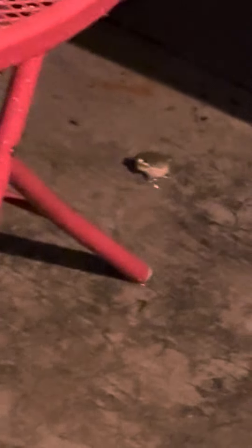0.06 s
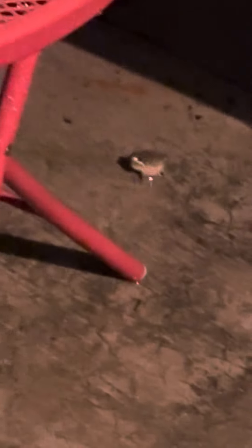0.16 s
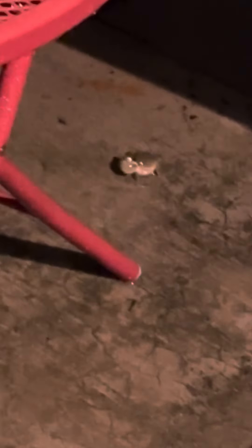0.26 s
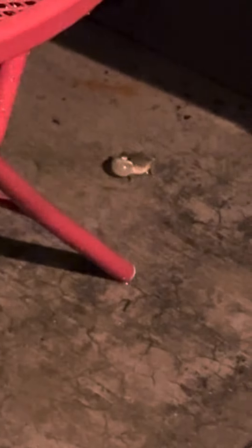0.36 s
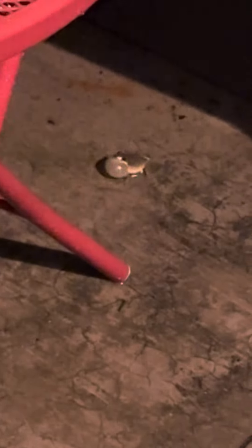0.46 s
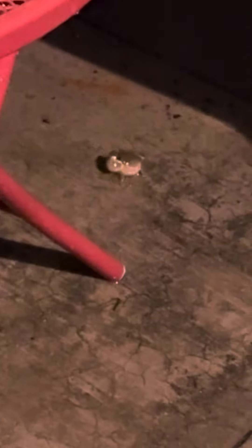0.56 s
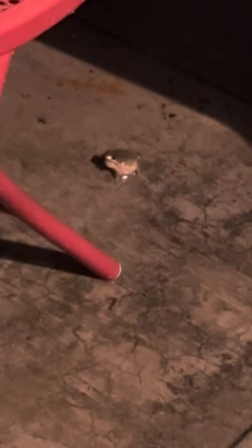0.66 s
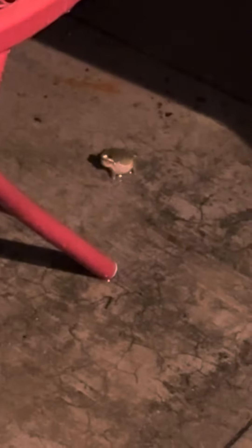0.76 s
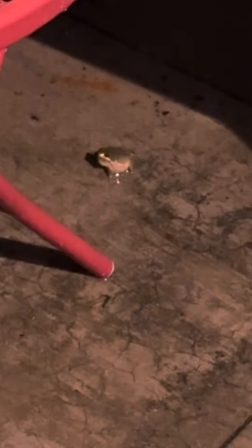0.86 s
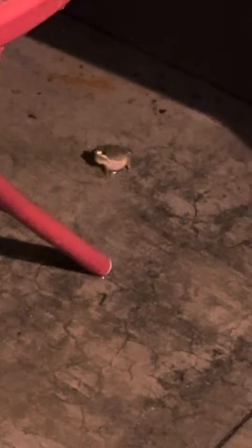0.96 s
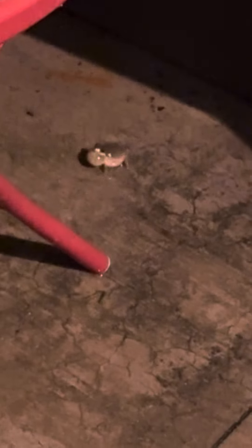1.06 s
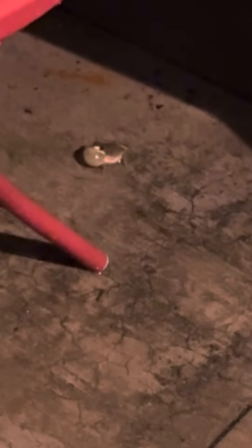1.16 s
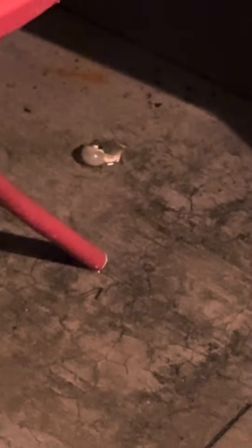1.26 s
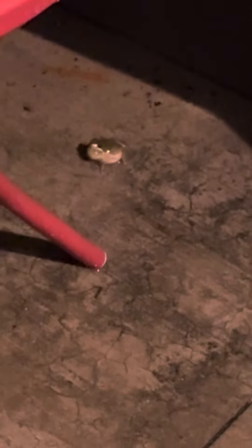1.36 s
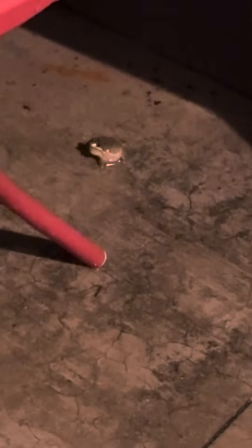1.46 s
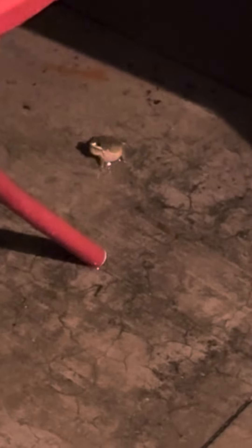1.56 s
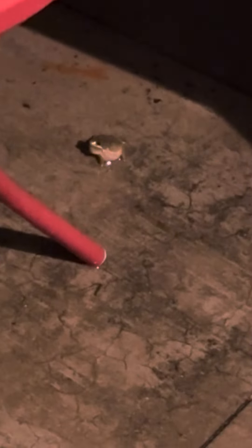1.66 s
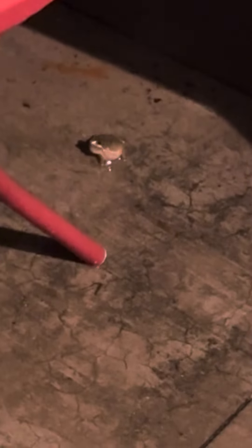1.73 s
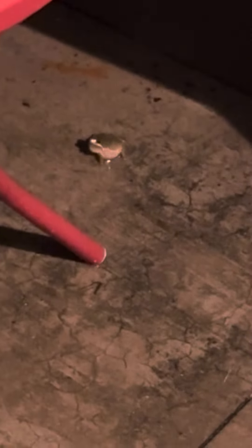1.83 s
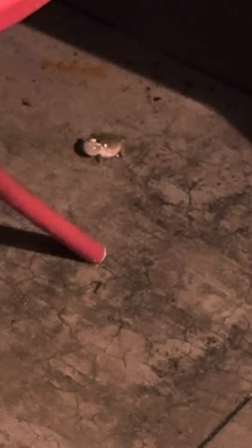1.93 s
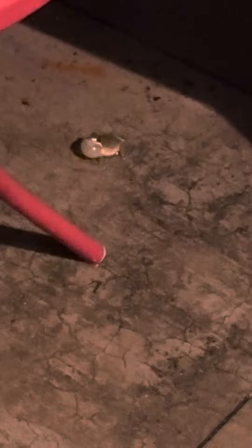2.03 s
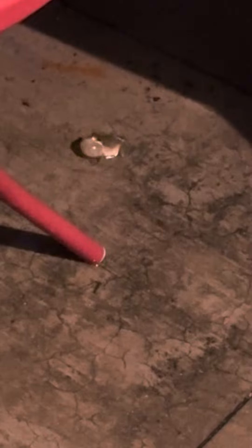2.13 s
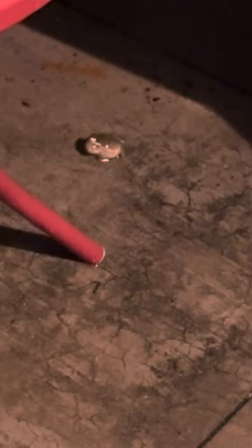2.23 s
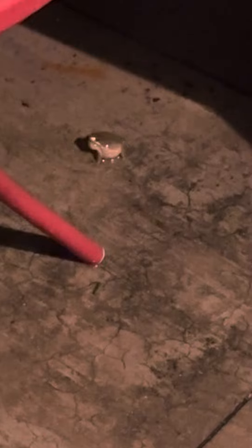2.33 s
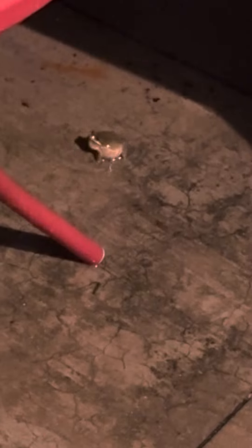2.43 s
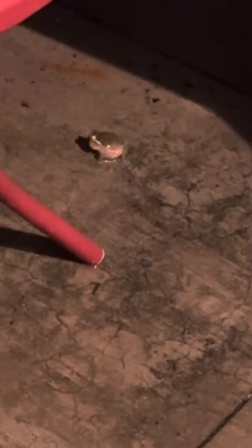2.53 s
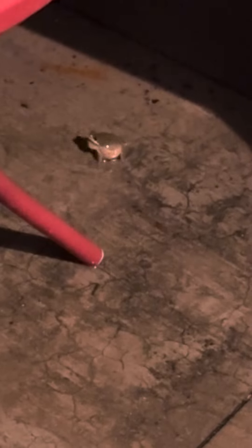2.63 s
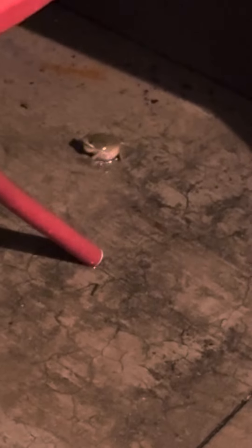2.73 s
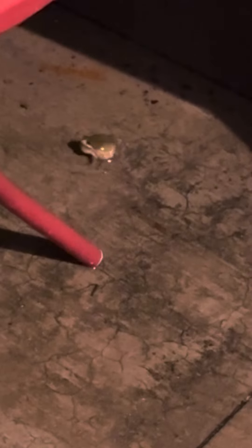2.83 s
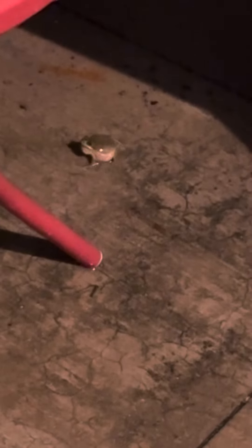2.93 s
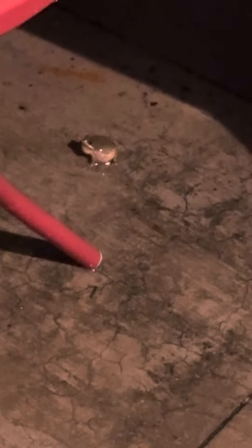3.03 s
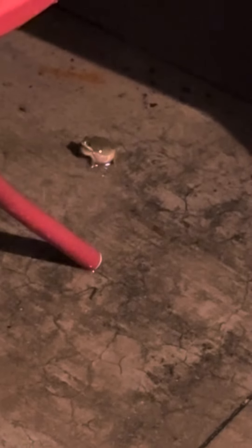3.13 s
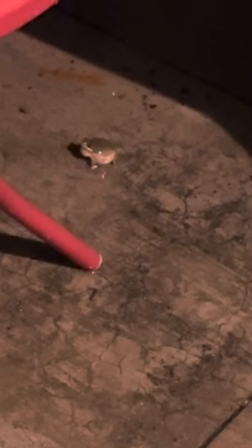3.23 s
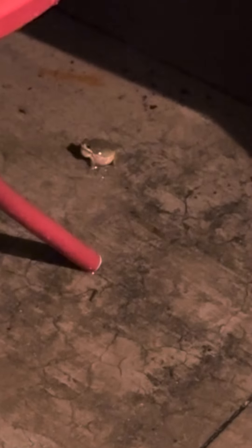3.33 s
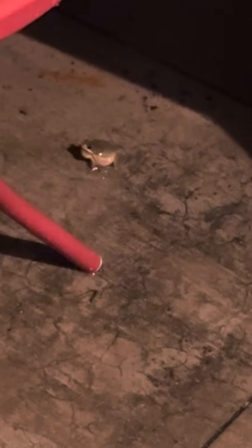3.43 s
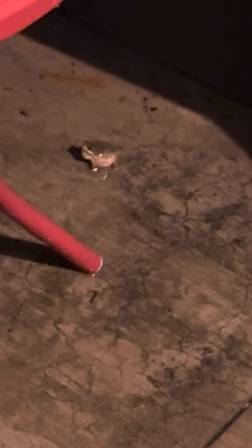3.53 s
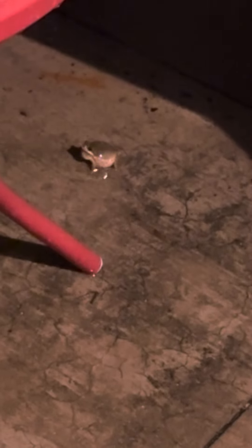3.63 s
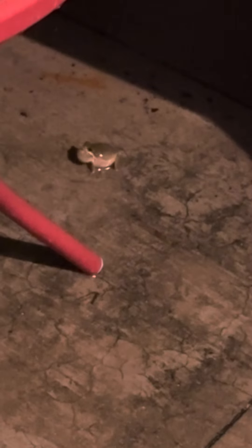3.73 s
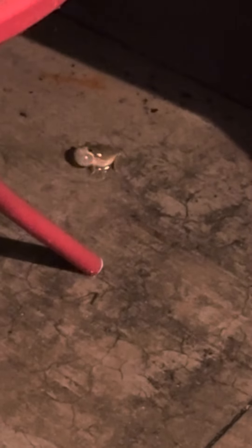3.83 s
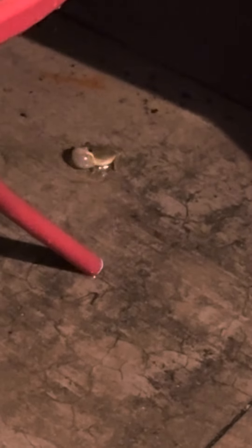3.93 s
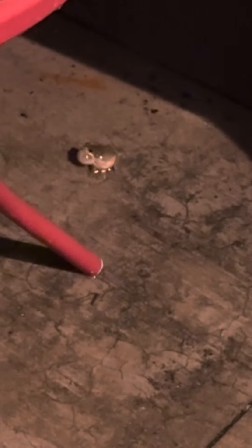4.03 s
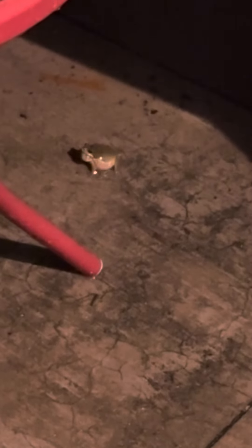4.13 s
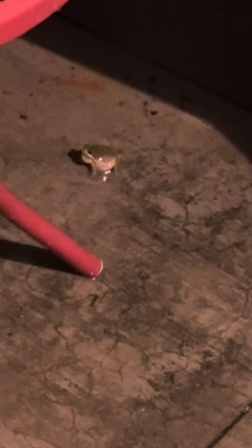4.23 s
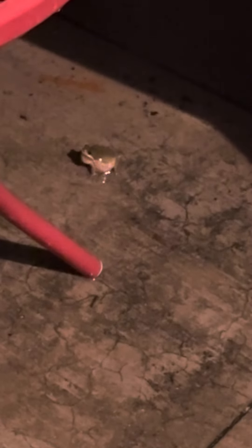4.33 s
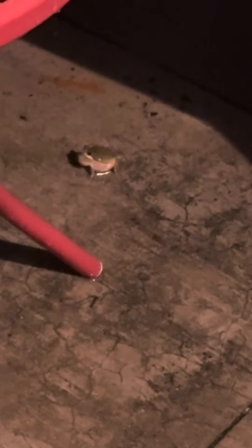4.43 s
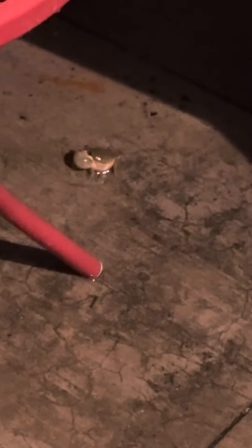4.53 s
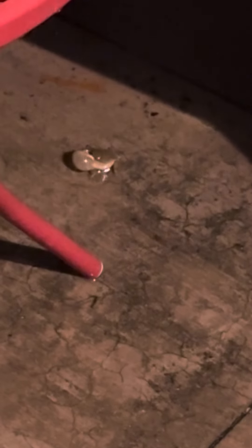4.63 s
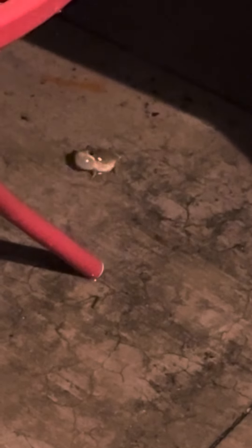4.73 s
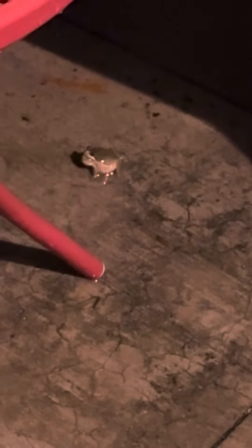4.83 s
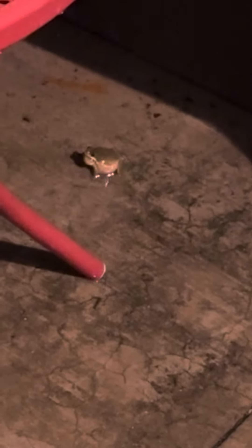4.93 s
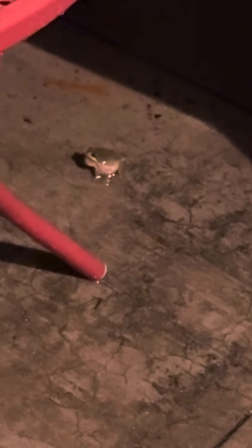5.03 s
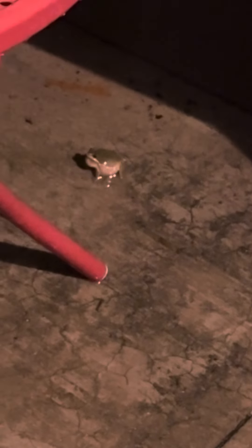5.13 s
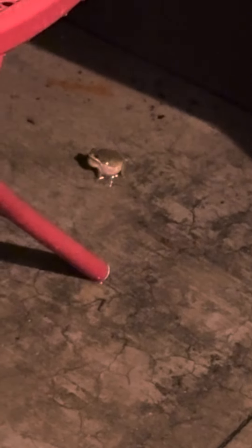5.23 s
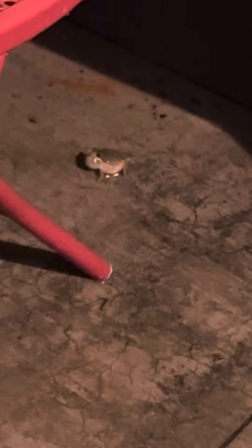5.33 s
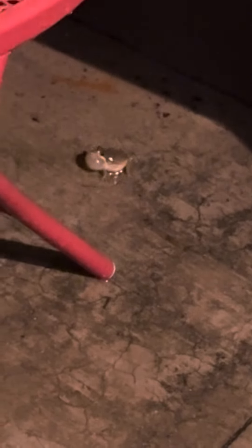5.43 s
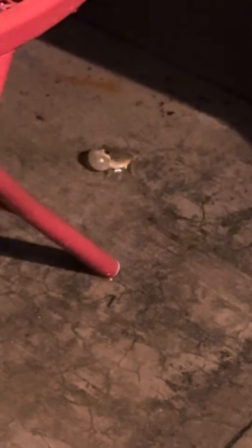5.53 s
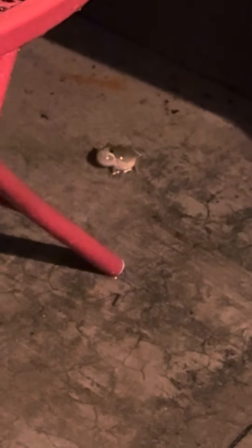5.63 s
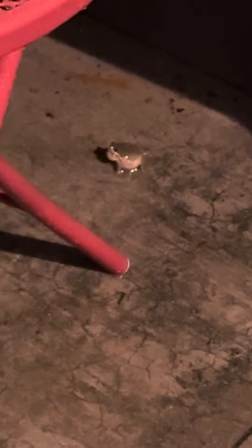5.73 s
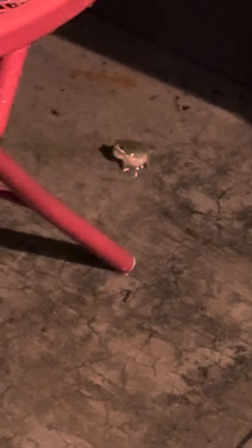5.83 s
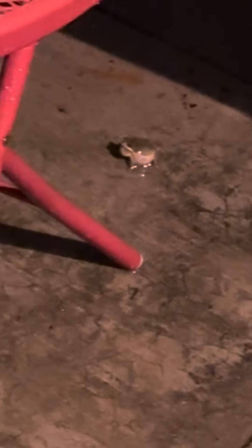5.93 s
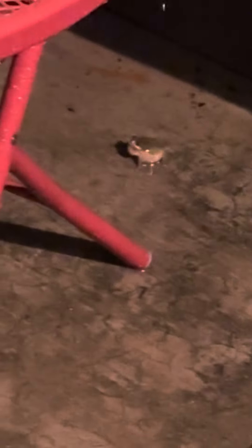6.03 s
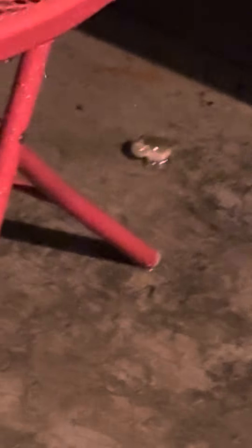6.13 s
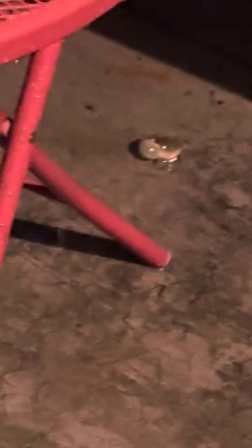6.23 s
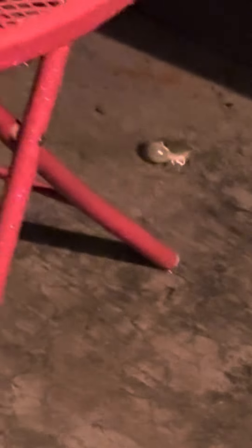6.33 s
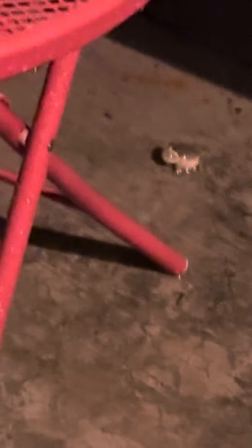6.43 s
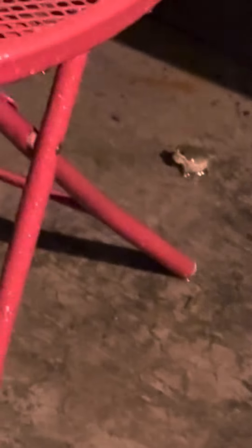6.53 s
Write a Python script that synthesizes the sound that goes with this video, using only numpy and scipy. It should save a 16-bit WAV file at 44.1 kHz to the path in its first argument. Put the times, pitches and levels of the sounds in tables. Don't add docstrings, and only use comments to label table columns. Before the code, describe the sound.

Seven quick buzzy frog calls, each about a quarter second, ring close to hard walls amid pattering drips, soft rain and a far engine-like hum.

```python
import sys
import numpy as np
from scipy import signal
from scipy.fft import rfft, irfft, next_fast_len
from scipy.io import wavfile
from scipy.ndimage import uniform_filter1d, map_coordinates

SR = 44100
rng = np.random.default_rng(int(sys.argv[2]) if len(sys.argv) > 2 else 0)


def digitize_waveform(pressure):
    field = np.atleast_2d(pressure).T
    bounded = np.clip(field, -1, 1)
    quanta = np.round(bounded * 32767).astype(np.int16)
    wavfile.write(sys.argv[1], SR, quanta)


def magnitude_from_level(level_db):
    exponent = np.asarray(level_db, float) / 20
    return 10 ** exponent


N = 289737


def unit(x):
    return x / np.sqrt(np.mean(x ** 2) + 1e-20)


def along(points, hz):
    point_hz, value = np.transpose(points)
    return np.interp(np.log(hz + 1), np.log(point_hz + 1), value)


def wobble(rate_hz):
    knots = rng.standard_normal(int(N * rate_hz / SR) + 4)
    return map_coordinates(knots, [np.arange(N) * rate_hz / SR])


def filtered(x, response):
    size = next_fast_len(N + SR // 2)
    spectrum = rfft(x, size) * response(np.fft.rfftfreq(size, 1 / SR))
    return irfft(spectrum, size)[..., :N]


def rush(spectrum, patchy_db):
    z = signal.stft(rng.standard_normal(N), nperseg=512)[2]
    patches = uniform_filter1d(rng.standard_normal(z.shape), size=6, axis=0)
    patches = unit(uniform_filter1d(patches, size=10, axis=1))
    noise = signal.istft(z * magnitude_from_level(patchy_db * patches), nperseg=512)[1][:N]
    closed = [(1, -120)] + list(spectrum)
    return unit(filtered(noise, lambda hz: magnitude_from_level(along(closed, hz))))


def bursts(times, hz, db, rise_s, fall, phase):
    index = np.round(times * SR).astype(int)[:, None] + np.arange(-SR // 128, SR // 128)
    t = index / SR - times[:, None]
    bell = np.exp(-(t / (rise_s[:, None] * np.where(t > 0, fall, 1))) ** 2)
    wave = magnitude_from_level(db)[:, None] * bell * np.cos(2 * np.pi * hz[:, None] * t + phase[:, None])
    return np.bincount(index.clip(0, N - 1).ravel(), wave.ravel(), N)


# (time [s], level [dB])
MACHINERY_LOAD = [
    (0, -37),
    (.9, -41),
    (2.0, -40.5),
    (2.5, -40.5),
    (2.9, -41.5),
    (4.2, -38.5),
    (4.75, -41),
    (6.57, -40),
]
# (frequency [Hz], density [dB per Hz])
RUMBLE = [(12, -63), (20, -40), (41, -10), (65, -2), (108, -5), (157, -10.5), (206, -12), (377, -18.5),
          (500, -24), (650, -39), (1100, -120)]
# (frequency [Hz], density [dB per Hz])
HUM = [(52, -38), (60, -6.5), (66, -12.5), (76, -41.5)]
# (frequency [Hz], density [dB per Hz])
RAIN = [(150, -37), (400, 0.5), (1000, 3), (2200, -1.5), (4000, -3), (6000, -3.5), (8500, -3), (10800, -4),
        (11800, -7), (16000, -9)]
# (frequency [Hz], density [dB per Hz])
CHORUS = [(2450, -30), (2750, -3), (3050, 0), (3400, -30)]


def night():
    t = np.arange(N) / SR
    load_db = np.interp(t, *np.transpose(MACHINERY_LOAD))
    rumble = magnitude_from_level(load_db + .9 * wobble(4.35)) * rush(RUMBLE, patchy_db=1.2)
    hum = magnitude_from_level(load_db - 13) * rush(HUM, patchy_db=2)
    rain_db, easing_db_per_s = -40.5, .38
    rain_db = rain_db - easing_db_per_s * t + .095 * wobble(3) + 1.24 * wobble(10)
    rain = magnitude_from_level(rain_db) * rush(RAIN, patchy_db=.7)
    chorus = magnitude_from_level(-55.5 + 1.9 * wobble(2.77)) * rush(CHORUS, patchy_db=3.5)
    return rumble + hum + rain + chorus


# (time [s], tick peak [dB], tick frequency [Hz], snap peak [dB])
DROPS = [(0.004, -25, 8800, -43), (0.3646, -28, 8400, -31), (0.4032, -28, 10500, -30),
         (0.5883, -27, 10900, -24), (0.8122, -27, 8800, -36), (1.3111, -26, 8600, -27),
         (1.4527, -25, 6200, -36), (1.6529, -30, 10500, -32), (1.928, -27, 10500, -28),
         (1.9333, -26, 10500, -24), (1.9408, -22, 7900, -24), (1.9978, -29, 8100, -30),
         (2.1366, -26, 8600, -34), (2.2636, -32, 9600, -28), (2.3709, -26, 8300, -36),
         (2.3988, -31, 10900, -24), (2.5483, -22, 9800, -31), (2.683, -28, 9000, -27),
         (2.8966, -26, 10700, -30), (3.4828, -38, 7800, -29), (3.5767, -29, 5900, -34),
         (3.6622, -26, 10000, -27), (4.0096, -22, 8100, -29), (4.1135, -24, 8600, -37),
         (4.2435, -29, 8600, -26), (4.4435, -26, 7500, -33), (4.9893, -29, 10700, -28),
         (5.0483, -31, 10300, -29), (5.169, -28, 8600, -33), (6.2872, -25, 10300, -26)]


def drops(small_db=-50, spread_db=6.5, count=500):
    s, tick_db, hz, snap_db = np.transpose(DROPS)
    chance = rng.random((count, 4))
    patter_db = small_db - spread_db * np.log(chance[:, 1:3] + .03)
    s = np.append(s, chance[:, 0] * N / SR)
    hz = np.append(.9 * hz, 4500 + 6500 * chance[:, 3])
    tick_db = np.append(tick_db + 1.5, patter_db[:, 0])
    snap_db = np.append(snap_db + .5, patter_db[:, 1] - 4)
    snap_hz = np.full(len(s), 13200.)
    phase = 2 * np.pi * rng.random(len(s))
    hits = bursts(s, hz, tick_db, .48 / hz, 3, phase)
    hits += bursts(s, snap_hz, snap_db, .7 / snap_hz, 3, phase)
    spray_decay_s = .008
    splash = signal.lfilter([1], [1, -np.exp(-1 / (spray_decay_s * SR))], np.abs(hits))
    spray = filtered(rng.standard_normal(N), lambda f: f > 4500)
    return hits + magnitude_from_level(-33) * np.abs(splash) * spray


def pulse_train(first_s, last_s, rate_hz, late_ms):
    late_s = late_ms / 1000
    k = np.arange(round((last_s - late_s - first_s) * rate_hz) + 1)
    drag_s = late_s * np.exp((k - k[-1]) / 1.19)
    return first_s + k / rate_hz + drag_s, k / k[-1]


def effort(times, throat_db, bloom_db, peak_db, droop_db, before_end_s):
    since, left = np.abs(times - times[0]), np.abs(times[-1] - times)
    release = np.exp(-left / .011)
    sag_db_per_s = 4.5
    throat = throat_db - 13 * np.exp(-since / .014) - sag_db_per_s * since - 4.5 * release
    bloom = np.exp(-((left - .18) / .054) ** 2)
    slack = -34.5 + bloom_db * bloom - 22 * np.exp(-since / .0099) - 3 * release
    early = (left - before_end_s).clip(0) / .17
    late = (1 - left / before_end_s).clip(0)
    taut = peak_db - 35 * early ** 2.54 - droop_db * late ** 2
    taut -= 13 * np.exp(-since / .037) + 10 * np.exp(-left / .0077)
    return throat, slack, taut


# (first pulse [s], last pulse [s], pulse rate [Hz], lateness of last pulse [ms])
CALLS = [
    (0.179, 0.4318, 95.97, 2.7),
    (0.9699, 1.2227, 95.81, 2.3),
    (1.8392, 2.0806, 95.95, 1.7),
    (3.6744, 3.9127, 97.48, 2.4),
    (4.4043, 4.6439, 96.7, 1.7),
    (5.2611, 5.5217, 96.91, 2.6),
    (6.0312, 6.2927, 96.25, 1.7),
]
# (throat [dB], slack sac bloom [dB], taut sac peak [dB], its droop [dB], peak before end [s])
EFFORT = [
    (-27, 6.5, -14.5, 4.5, 0.091),
    (-27.5, 5.5, -14, 4, 0.094),
    (-27.5, 5, -14.5, 3.5, 0.082),
    (-28.5, 9, -13, 8.5, 0.075),
    (-28.5, 9.5, -13.5, 4, 0.087),
    (-29, 9, -14, 7.5, .085),
    (-29.5, 7.5, -14.5, 1, 0.092),
]
POSTURE = [
    (0, 0, .4),
    (.08, .2, .3),
    (.17, .85, 0),
    (.27, 1, .1),
    (.6, 1, .1),
    (.76, 1, .85),
    (.88, 1, 1),
    (.95, .9, .5),
    (1, .15, 0),
]
# (low posture [Hz], high posture [Hz], level [dB], follows taut sac [0-1], peak delay [ms], rise [ms])
THROAT = (1185, 1270, 8.5, 0, .3, 2.55)
SLACK_SAC = (2270, 2550, 8, 0, -.2, 2.5)
TAUT_SAC = (2912, 2965, 8, 1, .7, 2.35)
FILLING = [(1770, 1718, -5.5, 0.27, -0.5, 2.88), (2140, 2158, -3, 0.26, -2.5, 2.3),
           (970, 1010, -10.5, 0.19, 0, 1.6), (3950, 4036, -2.5, 0.43, -0.05, 1.8),
           (3670, 3460, -2.5, 0.082, 0.2, 1.3), (6460, 6300, -10, 0.091, 1.5, 0.89)]
STRAIN = [(3180, 3520, -8, 0.85, 0.52, 2.25), (4250, 3980, -13.5, 0.97, 1.26, 0.57),
          (4560, 4720, -16, 0.25, 0.81, 3.9), (5420, 5680, -12, 0.21, 0, 2.05),
          (7400, 7330, -14, 0.53, 0, 1.4), (8500, 8150, -20, 1, 0.44, 1.44),
          (7430, 5200, -24, 0.75, 1.5, 1.33)]
# (frequency [Hz], density [dB per Hz])
RASP = [(1500, -31), (3000, 2.5), (4500, -28.5), (6000, -21.5), (7500, -12.5), (8800, -12), (9300, -47)]


def frog(jitter_us=20, limp_us=25, wander_us=170, limp_db=.7, scatter_db=.45, smear_rad=.6, detune=.004):
    voice, airflow = np.zeros(N), np.zeros(N)
    filling_rows = [THROAT, SLACK_SAC] + list(FILLING)
    partials = filling_rows + [TAUT_SAC] + list(STRAIN)
    start_phase = 2 * np.pi * rng.random(len(partials))
    limping, wander = wobble(12), wobble(14)
    creep_per_s = .01
    posture_share, posture_filling, posture_strain = np.transpose(POSTURE)
    for call, strength in zip(CALLS, EFFORT):
        times, share = pulse_train(*call)
        count = len(times)
        at = (times * SR).astype(int)
        limp = (-1.) ** np.arange(count) * limping[at]
        shift_us = jitter_us * rng.standard_normal(count) + limp_us * limp + wander_us * wander[at]
        times = times + 1e-6 * shift_us
        filling = np.interp(share, posture_share, posture_filling)
        strain = np.interp(share, posture_share, posture_strain)
        throat_db, slack_db, taut_db = effort(times, *strength)
        creep_s = creep_per_s * (times - times[0]) ** 2
        for i, (row, phase0) in enumerate(zip(partials, start_phase)):
            low_hz, high_hz, db, follows, delay_ms, rise_ms = row
            delay_s = delay_ms / 1000
            posture = filling if i < len(filling_rows) else strain
            level_db = throat_db + follows * (taut_db - throat_db)
            if i == 1:
                level_db = slack_db
            chance = rng.standard_normal((count, 4))
            hz = (low_hz + posture * (high_hz - low_hz)) * (1 + detune * chance[:, 3])
            treble = np.minimum(hz / 3000, 1.8)
            size_db = db + level_db + treble * (scatter_db * chance[:, 0] + limp_db * limp)
            phase = phase0 + 2 * np.pi * hz * (delay_s + creep_s) + smear_rad * chance[:, 1] * treble
            rise_s = rise_ms / 1000 * np.exp(.06 * chance[:, 2])
            voice += bursts(times + delay_s, hz, size_db, rise_s, .85, phase)
        air_db = .33 * taut_db + .51 * throat_db
        still = np.zeros(count)
        airflow += bursts(times + .00052, still, air_db, still + .0047, .98, still)
    return voice + magnitude_from_level(-15) * airflow * rush(RASP, patchy_db=1.5)


# (delay [ms], level [dB])
WALLS = [(3.6, -14), (7.3, -44), (12.5, -22), (19.0, -20.5)]
# (frequency [Hz], t60 [s])
YARD = [(800, .25), (3000, .4), (9000, .2)]


def yard(x, tail_db=-30):
    hz, t, z = signal.stft(rng.standard_normal(SR // 2), SR, nperseg=256)
    decay = magnitude_from_level(-60 * t / along(YARD, hz)[:, None])
    tail = signal.istft(z * decay, SR, nperseg=256)[1]
    tail *= magnitude_from_level(tail_db) / np.linalg.norm(tail)
    answer = np.pad(tail, (SR // 100, 0))
    for ms, db in WALLS:
        answer[round(ms * SR / 1000)] += magnitude_from_level(db)
    return signal.fftconvolve(x, answer)[:N]


def scene():
    background = night() + drops()
    near = frog()
    return np.tile(background + near + yard(near), (2, 1))


# (frequency [Hz], phase [rad])
PORT_PHASE = [(200, 0), (480, -.35), (900, -.55), (1400, -.2), (1650, 0), (4700, 0), (4900, .5),
              (5050, 5.7), (5250, 6.28), (6700, 6.3), (8000, 7.3), (11000, 8.75), (11700, 9.42),
              (13600, 9.5), (16000, 11.2)]
# (frequency [Hz], left minus right [dB])
PORT_BALANCE = [(350, 0), (600, 2.4), (1400, 1.1), (1650, 0)]


def ports(dry):
    side = np.array([[-.5], [.5]])

    def response(hz):
        gain = magnitude_from_level(-side * along(PORT_BALANCE, hz))
        return gain * np.exp(1j * (side + .5) * along(PORT_PHASE, hz))
    return filtered(dry, response)


# (frequency [Hz], level [dB])
PORT_LOOSE = [(250, -62.5), (500, -7.5), (1400, -11.5), (1800, -50), (6500, -57), (7500, -2.5),
              (11000, -0.5), (14500, -18)]


def loose(dry):
    hz, _, z = signal.stft(dry, SR, nperseg=256)
    scrambled = np.abs(z) * np.exp(2j * np.pi * rng.random(z.shape))
    scrambled *= magnitude_from_level(along(PORT_LOOSE, hz))[:, None]
    return signal.istft(scrambled, SR, nperseg=256)[1][:, :N]


# (low [Hz], high [Hz], dropped [0 sum, 1 difference], share of time [0-1])
MUTED_BANDS = [(4500, 5400, 1, .3), (6500, 7400, 1, .5), (11000, 11700, 0, .75), (11700, 13800, 0, 1),
               (13800, 14600, 0, .65), (14600, 15200, 0, .2)]
OPEN_MOMENTS = [2.399, 2.683, 3.577, 4.01, 4.113, 4.555, 6.287]


def mute_bands(pair, open_s=.014, top_hz=15850):
    left, right = pair
    hz, t, z = signal.stft([left + right, left - right], SR, nperseg=1024)
    z[:, hz > top_hz] = 0
    calm = np.abs(t[:, None] - np.array(OPEN_MOMENTS)).min(axis=1) > open_s
    for low_hz, high_hz, which, share in MUTED_BANDS:
        mood = uniform_filter1d(rng.standard_normal(len(t)), size=3)
        muted = calm & (mood <= np.quantile(mood, share))
        band = (hz >= low_hz) & (hz < high_hz)
        z[int(which)][np.ix_(band, muted)] = 0
    both, apart = signal.istft(z, SR, nperseg=1024)[1][:, :N]
    return np.array([both + apart, both - apart]) / 2


def top_cut(x):
    return signal.sosfilt(signal.butter(12, 17120, fs=SR, output="sos"), x)


def record(dry):
    mix = mute_bands(ports(dry) + loose(dry))
    return top_cut(mix)


dry = scene()
out = record(dry)
digitize_waveform(out)
```